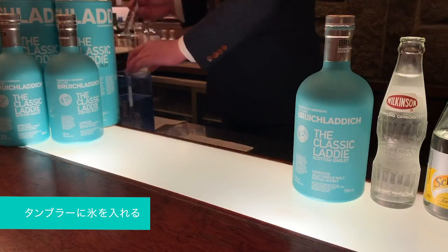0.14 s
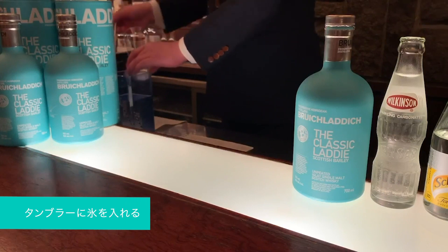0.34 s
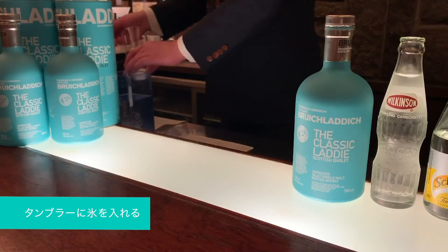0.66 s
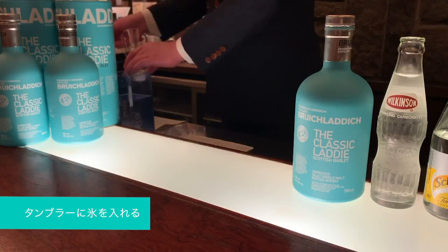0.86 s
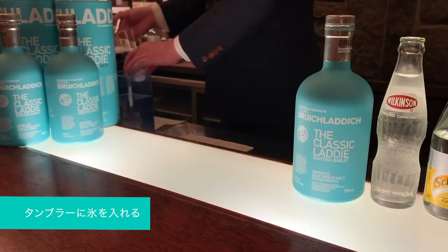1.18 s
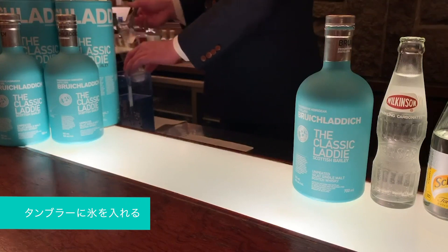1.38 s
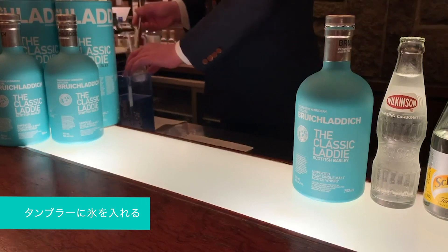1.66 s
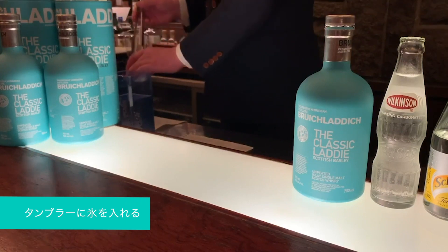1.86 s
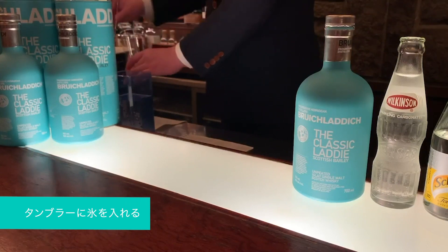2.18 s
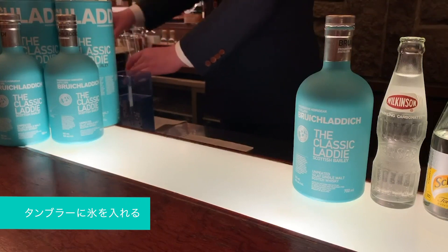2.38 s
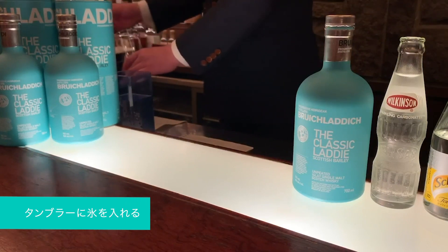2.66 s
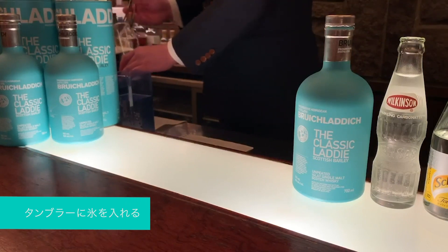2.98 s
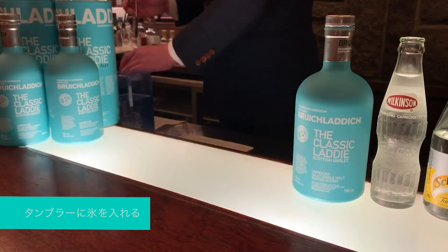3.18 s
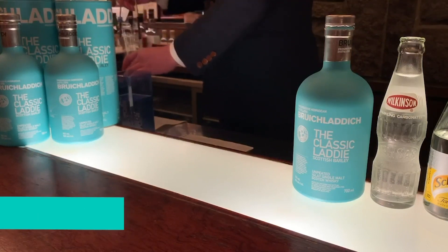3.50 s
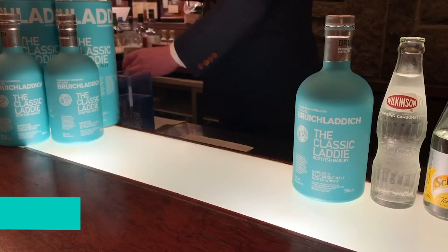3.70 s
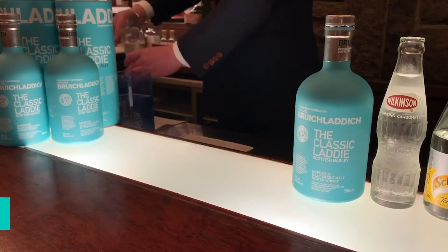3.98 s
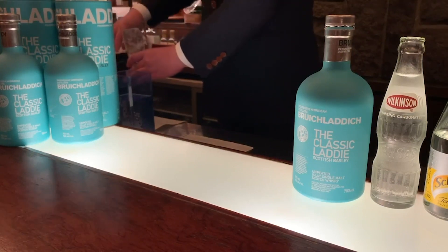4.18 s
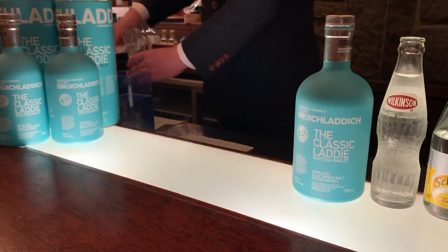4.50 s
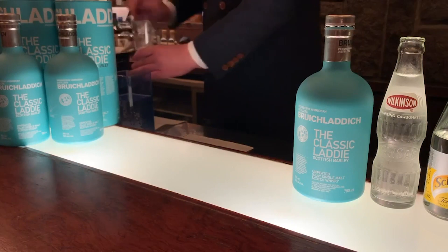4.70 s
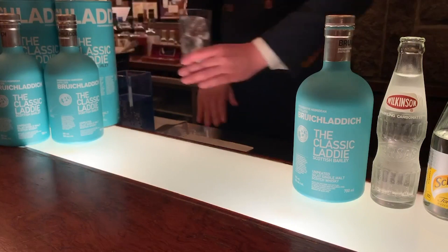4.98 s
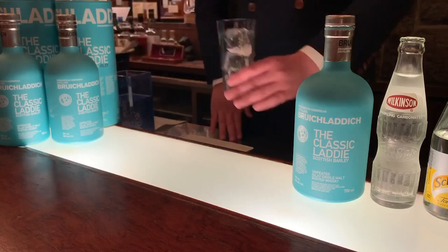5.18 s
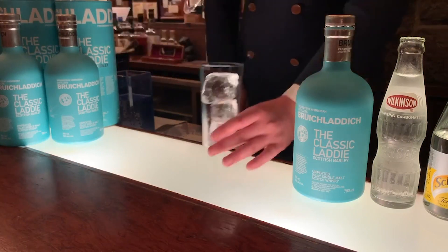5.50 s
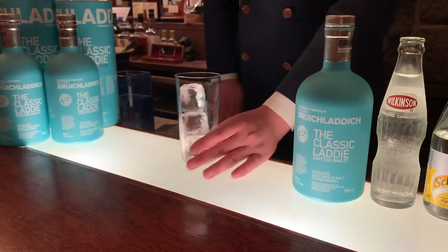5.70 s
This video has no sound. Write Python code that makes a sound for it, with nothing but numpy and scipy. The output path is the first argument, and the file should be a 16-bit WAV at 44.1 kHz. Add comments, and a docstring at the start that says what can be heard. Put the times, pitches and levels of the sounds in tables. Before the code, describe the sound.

An ice cube clinks into a tall glass, then metal tongs crunch through a tub of ice. Another cube drops in with a sharp, ringing clink and a short bounce, followed by a quick run of further clinks. The tongs dig again and clatter down onto the ice, and the glass is moved with light ticks and a faint rustle. The sounds are nearby and slightly left, over a steady refrigerator hum in a small bar.

```python
"""An ice cube clinks into a tall tumbler, over the hum of refrigerators in a small, lively bar.
Steel tongs crunch through a tub of ice and more cubes drop in: each cracks against the wall, rings the
glass and thumps the air inside as it lands and bounces. Then the tongs clatter back onto the ice, and
the glass is carried off with light ticks and a faint rustle of hand and sliding cubes."""
import sys
import numpy as np
from scipy import signal
from scipy.fft import rfft, irfft, next_fast_len
from scipy.io import wavfile
from scipy.ndimage import uniform_filter1d

SR = 44100
rng = np.random.default_rng(int(sys.argv[2]) if len(sys.argv) > 2 else 0)


def store_pcm(level_fs):
    """Save levels as 16-bit WAV."""
    pcm = np.round(np.clip(level_fs, -1, 1) * 32767).astype(np.int16)
    wavfile.write(sys.argv[1], SR, np.atleast_2d(pcm).T)


N = 257940
AGE = np.arange(SR) / SR  # seconds since a blow
BLOW_SAMPLES, TOP_HZ = SR // 100, 11800


def undb(db):
    """Decibels to gain."""
    return 10 ** (np.asarray(db) / 20)


def level(x, db):
    """Set the rms level of a steady sound."""
    return x * undb(db) / np.sqrt(np.mean(x ** 2))


def blow(x, db):
    """Set the energy of a blow, as its level if it all fell in 10 ms."""
    return x * undb(db) * np.sqrt(BLOW_SAMPLES / np.sum(x ** 2))


def fade(t60):
    """One second of exponential decay, falling 60 dB every t60 seconds."""
    return np.exp(-np.log(1000) * AGE / t60)


def along(points, hz):
    """Read (frequency, value) points on a log-frequency axis."""
    point_hz, value = np.transpose(points)
    return np.interp(np.log(hz + 1), np.log(point_hz), value)


def colour(x, points, tilt_db=0, pivot_hz=4500):
    """Causal EQ through (freq_hz, gain_db) points, tilted by tilt_db per octave about a pivot."""
    size = 2 * next_fast_len(len(x))
    hz = np.fft.rfftfreq(size, 1 / SR)
    octaves = np.log2(np.maximum(hz / pivot_hz, 1 / 10))
    cepstrum = irfft(np.log(undb(along(points, hz) + tilt_db * octaves)))
    cepstrum[1:size // 2] *= 2  # minimum phase: nothing rings ahead of a hit
    cepstrum[size // 2 + 1:] = 0
    return irfft(rfft(x, size) * np.exp(rfft(cepstrum)))[:len(x)]


def add(track, start_s, sound):
    """Mix a sound into a track."""
    i = max(int(start_s * SR), 0)
    track[i:i + len(sound)] += sound[:max(N - i, 0)]


def walk(rate_hz):
    """Smooth random drift with an rms of 1."""
    hold = int(SR / rate_hz)
    steps = np.repeat(rng.standard_normal(N // hold + 1), hold)
    return level(uniform_filter1d(uniform_filter1d(steps, hold), hold)[:N], 0)


def grains(size, spread_db):
    """Dense micro-contacts of very unequal strength."""
    return rng.standard_normal(size) * undb(spread_db * np.minimum(rng.standard_normal(size), 2))


def ring(modes, damped_t60=np.inf):
    """Decaying modes, cut short by whatever rests on the body; the contact point sets each one's sign."""
    out = 0
    for hz, db, t60 in modes:
        tone = rng.choice([-1, 1]) * undb(db) * np.sin(2 * np.pi * hz * AGE)
        out = out + tone * fade(t60) / np.sqrt(t60)
    return out * fade(damped_t60)


def detuned(modes, share):
    """Grip and load shift a body's modes a little from blow to blow."""
    return [(hz * (1 + share * rng.standard_normal()), db, t60) for hz, db, t60 in modes]


def cluster(hz, spread, t60, count=6):
    """A few close modes, as an uneven lump has."""
    offsets = np.linspace(-1, 1, count) + 0.3 * rng.standard_normal(count)
    return ring([(hz * (1 + spread * offset), -3 * abs(offset), t60) for offset in offsets])


def lumpy(x, ripple_db, count=90):
    """Each lump of ice has its own irregular resonances."""
    hz = np.linspace(200, TOP_HZ, count)
    return colour(x, np.c_[hz, ripple_db * rng.standard_normal(count)])


def pings(force, t60, count):
    """Brief pings of ice, each at its own pitch; they come thicker and louder while the force is high."""
    out, age = np.zeros(2 * SR), AGE[:SR // 6]
    force_spent = np.cumsum(force) / np.sum(force)
    decay = fade(t60)[:len(age)]
    for k, (when, place, softness) in enumerate(rng.random((count, 3))):
        hz = 1000 + (TOP_HZ - 1000) * (k + place) / count
        i = np.searchsorted(force_spent, when)
        gain = undb(-12 * softness) * force[i] ** .25
        out[i:i + len(age)] += gain * np.sin(2 * np.pi * hz * age) * decay
    return out[:SR]


def hops(start_s, first_hop_s, restitution, count):
    """Times of a bouncing body's contacts: each hop is a set share of the one before."""
    return start_s + np.r_[0, np.cumsum(first_hop_s * restitution ** np.arange(count - 1))]


# Stereo width of the room sound: freq_hz, side_gain_db
ROOM_WIDTH = [(40, -23.5), (125, -19), (250, -8.5), (500, -1.5), (1000, -1), (4000, -2)]
def stereo(mid, side):
    """Left and right from mid and side; long waves reach both sides alike."""
    return mid + colour(side, ROOM_WIDTH) * np.array([[1], [-1]])


# Reverb time of the bar: freq_hz, t60_s
ROOM_DECAY = [(300, 0.23), (1500, 0.29), (4000, 0.37), (7000, 0.3), (11000, 0.14)]
def room(x, early_db, tail_db, right_lag_samples=11):
    """Direct sound and quick echoes off counter and bottles, later on the right, then a diffuse tail."""
    echoes = grains(SR, spread_db=12) * fade(0.04) * (AGE > .002)
    near = blow(echoes, early_db) / np.sqrt(BLOW_SAMPLES)
    near[0] += 1  # the direct sound
    hz = np.fft.rfftfreq(SR, 1 / SR)
    noise, tail = rfft(rng.standard_normal((2, SR))), 0
    centres, t60s = np.transpose(ROOM_DECAY)
    for share, t60 in zip(np.eye(len(centres)), t60s):
        band = irfft(noise * along(np.c_[centres, share], hz), SR)
        tail = tail + band * fade(t60)
    tail = stereo(*tail) * (1 - fade(0.0058))  # the echoes need a moment to build up
    response = np.array([near, np.roll(near, right_lag_samples)])
    response += blow(tail, tail_db) * np.sqrt(2 / BLOW_SAMPLES)
    response /= np.sqrt(np.sum(response ** 2) / 2)
    return signal.fftconvolve(x[None], response, axes=1)[:, :N]


# Low rush of the fans: freq_hz, gain_db
FAN_EQ = [(15, -41), (25, -17), (48, -7), (68, -8.5), (91, -11.5), (124, -2.5), (291, -1), (323, -11.5),
          (513, -15), (682, -24.5), (817, -19.5), (883, -22.5), (4270, -48.5), (10000, -57), (12000, -77.5),
          (15600, -102.5), (22000, -120)]
# Refrigerator drone: pitch_hz, level_db, waver_depth (0 to 1)
HUM_TONES = [(57.6, -53.5, 0.87), (117.9, -54, 0.7), (180.2, -55, 0.8), (255, -47.5, 1), (287, -53, 0.7),
             (720, -65, 1), (810, -58, 0.12)]
def refrigerators():
    """Fan noise under wavering mains and compressor tones."""
    mid, side = (colour(rng.standard_normal(N), FAN_EQ) for _ in range(2))
    out = level(stereo(mid, side), -41.5)
    turn = 2j * np.pi * np.arange(N) / SR
    for hz, db, depth in HUM_TONES:
        waver = 1 + depth * (walk(6.5) + 1j * walk(7.6))
        out = out + level(np.real(waver * np.exp(turn * hz)), db)
    return out


# Thin, bright rustle of friction: freq_hz, gain_db
RUSTLE_EQ = [(500, -19), (2500, 1), (4400, 7.5), (6000, -8), (7400, 7), (8300, 8), (10300, 11),
             (11700, -14)]
# Scrapes and slides, one swell a move: the rows at 0.57, 3.05 and 3.15 s are the tongs scraping in the tub and
# on the rim, the rest hand and ice sliding: # peak_s, half_length_s, friction_db, tinkle_db, scrape_hz,
# glide_hz_per_s
SLIDE_MOVES = [(0.574, 0.037, -49.5, -64, 9560, 0.5), (2.757, 0.044, -68.5, -82, 9320, -4),
               (3.049, 0.03, -53, -75, 10600, 2998), (3.152, 0.029, -60.5, -62, 8500, -7),
               (4.813, 0.1, -58.5, -76, 9500, 3995), (4.899, 0.041, -47.5, -59, 10880, -4000),
               (4.960, 0.031, -49, -54.5, 10100, -12000), (5.075, 0.081, -60, -76, 10160, 14998),
               (5.534, 0.093, -58.5, -72, 9930, 4990), (5.735, 0.026, -52.5, -64, 9270, -2)]
def slides():
    """Each move swells with friction, a gliding scrape and uneven catches; shifting cubes tinkle."""
    t = np.arange(N) / SR
    shapes = np.array([np.exp(-((t - peak_s) / half_s) ** 2) for peak_s, half_s, *_ in SLIDE_MOVES])
    _, _, friction_db, tinkle_db, _, _ = np.transpose(SLIDE_MOVES)
    swells = shapes * undb(friction_db)[:, None]
    pitches = np.array([hz + glide * (t - peak_s) for peak_s, *_, hz, glide in SLIDE_MOVES])
    pitch = pitches[swells.argmax(axis=0), np.arange(N)]  # the loudest move sets the pitch
    pitch *= 1 + 0.00466 * walk(36)
    narrow_noise = walk(800) + 1j * walk(800)
    scrape = np.real(narrow_noise * np.exp(2j * np.pi * np.cumsum(pitch) / SR))
    catches = (rng.random(N) < 36 / SR) * rng.uniform(.15, 1, N)  # about 36 a second
    click = grains(BLOW_SAMPLES, spread_db=3) * fade(.015)[:BLOW_SAMPLES]
    crackle = colour(signal.fftconvolve(catches, click)[:N], RUSTLE_EQ)
    friction = lumpy(colour(grains(N, spread_db=6), RUSTLE_EQ), ripple_db=3)
    grind = level(crackle, 0) + level(friction, 0)
    tinkle = signal.fftconvolve(grind, cluster(4200, spread=.055, t60=.02))[:N]
    tinkle = level(tinkle, 0) * (undb(tinkle_db) @ shapes)
    rustle = level(friction, 0) + level(scrape, -7.5) + level(crackle, -1)
    stick_slip = undb(3 * walk(28))
    return (level(rustle, 0) * swells.sum(axis=0) + tinkle) * stick_slip


# Light handling and small cracks in the ice: start_s, level_db, pitch_hz, snap_db
TOUCHES = [(0.32, -44, 2900, -33.5), (0.441, -46.5, 2920, -29), (1.052, -44, 3320, -30),
           (3.827, -54, 4020, 6), (4.171, -44.5, 4220, -32), (4.751, -55, 4100, 8), (4.766, -51, 4150, 18),
           (4.9644, -48, 4200, 4), (5, -39, 4400, 20), (5.1234, -42, 4160, -14), (5.165, -45.5, 4100, -18),
           (5.3516, -40.5, 2960, -42), (5.4265, -47.5, 4300, -9), (5.83, -51, 4150, 8)]
def ticks():
    """Each light touch stirs one broad, very short resonance with more or less treble snap above it."""
    out = np.zeros(N)
    for start_s, db, hz, snap_db in TOUCHES:
        touch = grains(SR, spread_db=3) * fade(0.035) * (1 - fade(.008))
        body = [(hz / 4, -28), (hz / 1.15, -8), (hz, -1), (hz * 1.15, -12), (hz * 1.5, -15)]
        snap = [(7000, snap_db - 4), (9200, snap_db), (11500, snap_db - 3)]
        add(out, start_s, blow(colour(touch, body + snap), db))
    return out


# Crunch of loose cubes: freq_hz, gain_db
CRUNCH_EQ = [(200, -9), (700, 12.5), (1200, 2), (1700, 10), (2600, 4.5), (3200, 2), (5500, -2),
             (7200, -2.5), (9000, -0.5), (10400, 0), (11500, -32.5)]
# Hollow thump of the tub: pitch_hz, level_db, t60_s
TUB_MODES = [(123.5, -14.5, 0.24), (237, -21.5, 0.12), (359.8, -8, 0.26), (361.4, -8.5, 0.083)]
# Steel ring of the tongs: pitch_hz, level_db, t60_s
TONG_MODES = [(1745, -3.5, .38), (2205, -6, .1), (2276, 3, .22), (2295, 2, .2), (2340, -3, .14),
              (2890, -15, .2), (3205, -10, .22), (3550, -6, .24), (3865, -7, .15), (3941, -10, .2),
              (4360, -7, .15), (4660, -10, .12), (5152, -8, .2), (5540, -12, .12), (5819, -12, .2),
              (6070, -8, .14), (6750, -13, .09), (7700, -10, .12), (8360, -14, .16), (8820, -10, .12),
              (9351, -7, .16), (9566, -4, .13), (9960, -12, .15)]
def tong_bite(t60, db, tilt_db, thump_db, steel_db):
    """The tongs bite, crunch on through the cubes in fits and starts, chip them, thump the tub and ring."""
    force = 2.5 * fade(.012) + undb(3 * walk(300)[:SR]) * fade(t60)
    grit = blow(lumpy(grains(SR, spread_db=7) * force, ripple_db=3.5), 0)
    splinters = blow(pings(force ** 2, t60=.035, count=36), 1)
    crunch = blow(colour(grit + splinters, CRUNCH_EQ, tilt_db), db)
    thump = blow(ring(detuned(TUB_MODES, .05)), thump_db)
    steel = blow(ring(detuned(TONG_MODES, .003)), steel_db)
    return crunch + thump + steel


# The tongs crunch into the ice; the last row is a dull thump as they topple:
# start_s, level_db, tilt_db_per_octave, t60_s
TONG_CRUNCHES = [(.533, -49, 1, 0.15), (.557, -43.5, -3.5, 0.28), (.615, -41, 0.5, 0.45),
                 (0.705, -37, 0, 0.052), (0.716, -34.5, 3.5, 0.2), (0.762, -38.5, 0, 0.51),
                 (0.857, -37.5, 0.5, 0.12), (.868, -35, -1, 0.23), (2.370, -42.5, 2, 0.5),
                 (2.460, -42.5, 3.5, 0.12), (3.780, -44.5, 8, 0.46), (3.938, -41, 9.5, 0.024),
                 (3.962, -28, 8, 0.12), (4.053, -39.5, 5, 0.37), (4.156, -52.5, 2.5, 0.098),
                 (4.254, -41, 6, 0.68), (4.343, -37.5, 1.5, 0.56), (4.526, -37, -4.5, 0.11)]
def ice_tub():
    """The tongs crunch into the ice, muted by the hand; let go, they chatter, ring freely and topple."""
    out = np.zeros(N)
    for start_s, db, tilt_db, t60 in TONG_CRUNCHES:
        thump_db = db + .5 - .5 * tilt_db  # duller crunches thump the tub more
        add(out, start_s, tong_bite(t60, db, tilt_db, thump_db, steel_db=db - 24))
    times = hops(start_s=4.4355, first_hop_s=.029, restitution=0.72, count=4)
    # as the tongs tip over flat: crunch_db, tilt_db_per_octave, thump_db, steel_db
    first_hit, last_hit = (-22.5, 1, -26.5, -24), (-24, 7, -33, -23)
    for start_s, hit in zip(times, np.linspace(first_hit, last_hit, len(times))):
        add(out, start_s, tong_bite(0.13, *hit))
    return out


# A cube lands in the glass:
# start_s, crack_db, cube_hz, cube_db, glass_db, air_hz, knock_db, first_hop_s, bounce_loss_db
CUBE_LANDINGS = [(0.0194, -24.5, 9000, -19.5, -51, 659, -25, .0205, 11),
                 (1.813, -20.5, 4440, -32, -22.5, 741, -22.5, 0.054, 7),
                 (3.389, -30.5, 1755, -41, -39, 639, -27, 0.02, 40),
                 (3.503, -26.5, 4280, -32, -28, 671, -30, 0.05, 7)]
def touchdowns():
    """Every touchdown of a bouncing cube, each weaker than the last."""
    for start_s, crack_db, cube_hz, cube_db, glass_db, air_hz, knock_db, hop_s, loss_db in CUBE_LANDINGS:
        for bounce, hit_s in enumerate(hops(start_s, hop_s, restitution=.57, count=3)):
            lost_db = bounce * loss_db
            air_db = knock_db - .55 * bounce * lost_db
            yield hit_s, crack_db - lost_db, cube_hz, cube_db - lost_db, glass_db - lost_db, air_hz, air_db


def air_column():
    """A landing cube thumps the air inside the tumbler: a short hollow knock."""
    out = np.zeros(N)
    for start_s, *_, hz, db in touchdowns():
        knock = ring([(hz, 0, .125), (hz * .89, -9, .08)]) * (1 - fade(0.006))
        add(out, start_s, blow(knock, db))
    return out


# Brittle crack of a struck cube: freq_hz, gain_db
ICE_EQ = [(450, -14.5), (720, 1.5), (1350, -8), (1750, 0.5), (2300, -3.5), (2950, 3.5), (3650, -5.5),
          (4250, 6), (4850, 3.5), (5500, -16), (6500, 10), (7450, -1.5), (8300, -14), (9000, 13),
          (11300, 2.5), (12000, -16)]
def ice_crack(db, tilt_db, t60=.016):
    """A struck cube gives a gritty snap and many short overtones; harder is brighter."""
    snap = blow(lumpy(grains(SR, spread_db=4) * fade(t60), ripple_db=3.5), 0)
    overtones = blow(pings(fade(t60 / 2), t60=0.056, count=44), -2)
    size = 1 + .04 * rng.standard_normal()  # no two corners of a cube resonate alike
    cube_eq = [(hz / size, gain_db) for hz, gain_db in ICE_EQ]
    force_tilt_db = 0.45 * (db + 22.5)
    return blow(colour(snap + overtones, cube_eq, tilt_db + force_tilt_db), db)


# Chime of the tumbler, struck at the rim or near the base: pitch_hz, rim_db, base_db, t60_s
GLASS_MODES = [(2422, -10, -19, 3), (3219, -22, -7, .28), (4219, -7, -12, .12), (4264, 1, -10, .16),
               (4334, -14, -10, .12), (4770, -23, -13, .22), (5130, -16, -18, .8), (5484, -14, -16, .6),
               (5850, -12, -16, .16), (5980, -14, -13, .22), (6440, -15, -7, .16), (6620, -14, -6, .18),
               (6860, -16, -8, .15), (7100, -16, -12, .16), (7400, -15, -10, .2), (7978, -17, -19, .2),
               (8651, -17, -10, .13), (8780, -1, -12, .24), (8926, -8, -10, .2), (9013, -12, -1, .26),
               (9302, -7, -8, .13), (9485, -20, -4, .15), (9805, -7, 1, .22), (10039, -11, -3, .22),
               (10300, -18, -11, .15), (10895, -18, -2, .18), (11200, -26, -7, .12)]
def clink(start_s, crack_db, tilt_db, cube_hz, cube_db, glass_db, damped_t60, depth):
    """Ice on glass cracks, rings the cube briefly and the glass longer; the spot picks the partials."""
    crack = ice_crack(crack_db, tilt_db)
    cube = cluster(cube_hz, spread=min(210 / cube_hz, .06), t60=.03)
    # the ice inside shifts the strength and pitch of the glass's modes at every blow
    modes = [(hz, np.interp(depth, [0, 1], [rim_db, base_db]) + 2.5 * rng.standard_normal(), t60)
             for hz, rim_db, base_db, t60 in GLASS_MODES]
    glass = ring(detuned(modes, .0012), damped_t60)
    cubes_inside = sum(landed_s < start_s for landed_s, *_ in CUBE_LANDINGS)
    glass = blow(glass, glass_db - 0.5 * cubes_inside)  # a fuller glass is deader
    return (crack + glass + blow(cube, cube_db)) * (1 - fade(0.0011))


# A cube hits the wall: start_s, crack_db, ring_db, cube_hz, damped_t60_s, depth (0 rim to 1 base)
WALL_STRIKES = [(.001, -30.5, -31, 8970, 0.23, 0.56), (.028, -31.5, -32, 1760, .15, 0.78),
                (.080, -44, -39.5, 4260, 0.6, 0.47), (1.559, -41.5, -40, 4250, 3, 0.076),
                (1.8031, -13.5, -19.5, 6500, 0.92, 0.71), (1.828, -26, -28, 9700, 0.46, 0.71),
                (1.891, -32, -33, 1260, 0.56, 0.46), (1.966, -42.5, -39, 4080, 0.4, 0.74),
                (1.975, -39, -48, 4290, .4, 0.82), (3.171, -40, -55, 4280, 0.31, 0.78),
                (3.181, -37, -40, 4130, 0.55, 0.61), (3.366, -38, -45.5, 4000, 0.37, 0.036),
                (3.474, -27, -38, 9900, 0.4, 0.68), (3.482, -24, -30.5, 4210, .3, 0.8),
                (3.529, -28, -33, 9800, 0.32, 1), (3.559, -35, -33.5, 1810, 0.18, 0.89),
                (3.582, -38, -36, 4150, 0.38, 0.56), (3.603, -35.5, -42, 9950, .3, 1)]
def tumbler():
    """Cubes strike the wall on their way down, then land with a duller crack and bounce."""
    out = np.zeros(N)
    for start_s, crack_db, ring_db, cube_hz, damped_t60, depth in WALL_STRIKES:
        cube_db, glass_db = ring_db - 2.5, ring_db + 2.5
        add(out, start_s, clink(start_s, crack_db, 0, cube_hz, cube_db, glass_db, damped_t60, depth))
    for start_s, crack_db, cube_hz, cube_db, glass_db, _, _ in touchdowns():
        landing = clink(start_s, crack_db, -3, cube_hz, cube_db, glass_db, damped_t60=0.63, depth=0.59)
        add(out, start_s, landing)
    return out


def scene():
    """Glass and tub stand to the left; the hands are closer and more central; the hum leans right."""
    glass = room(tumbler(), early_db=-1, tail_db=2.5)
    knocks = room(air_column(), early_db=0, tail_db=-10)
    tub = room(ice_tub(), early_db=-4, tail_db=0)
    hands = room(ticks(), early_db=-11, tail_db=-13, right_lag_samples=6)
    hands += room(slides(), early_db=-8, tail_db=-5, right_lag_samples=6)
    hum = refrigerators() * undb([[-.6], [.6]])
    return undb(0.5) * (glass + knocks + tub) + undb(1) * hands + hum


# Treble colour of the microphone, in step at its two ports: freq_hz, gain_db
MIC_MID_EQ = [(4500, -0.5), (5300, 0.5), (6600, -2.5), (7250, -13), (7800, -2), (8400, -3), (8950, 0),
              (9400, 0), (10200, 3.5), (11700, 0)]
# Its colour where the two ports are opposed: freq_hz, gain_db
MIC_SIDE_EQ = [(1000, -0.5), (4500, 1), (6600, 1), (7400, 6.5), (8150, -0.5), (8500, -11), (9400, -14.5),
               (9850, -6), (10800, 9.5), (11400, 4.5)]
def record(dry):
    """The microphone's housing resonates in the treble; filters cut the deepest rumble and the very top."""
    mid = colour((dry[0] + dry[1]) / 2, MIC_MID_EQ)
    side = colour((dry[0] - dry[1]) / 2, MIC_SIDE_EQ)
    low_cut = signal.butter(3, 42, "high", fs=SR, output="sos")
    high_cut = signal.ellip(10, .2, 70, TOP_HZ, fs=SR, output="sos")
    return signal.sosfilt(high_cut, signal.sosfilt(low_cut, np.array([mid + side, mid - side])))


dry = scene()
out = record(dry)
store_pcm(out)
```